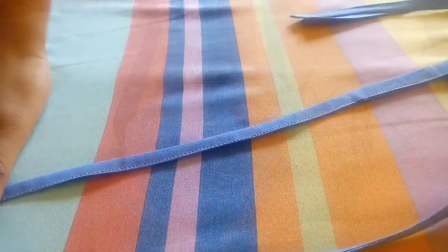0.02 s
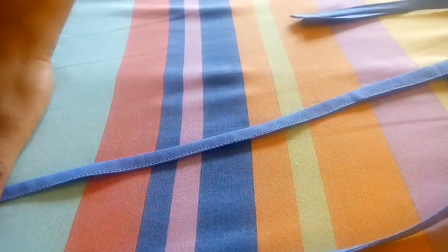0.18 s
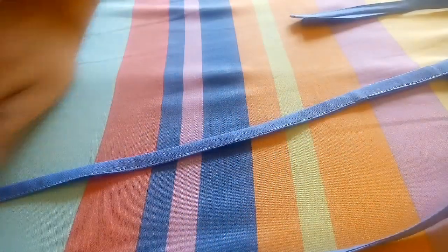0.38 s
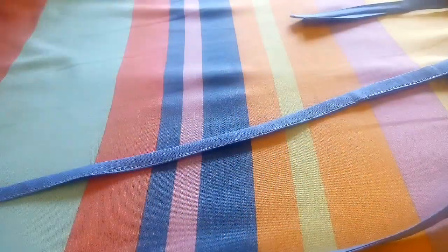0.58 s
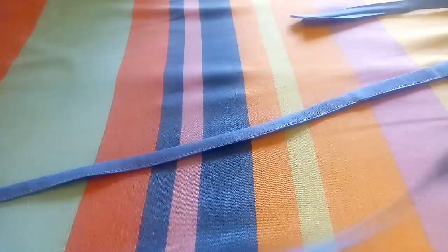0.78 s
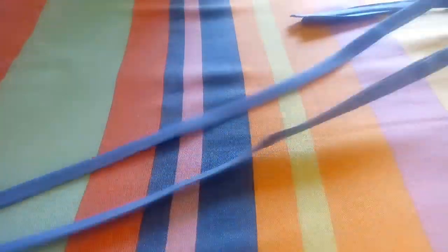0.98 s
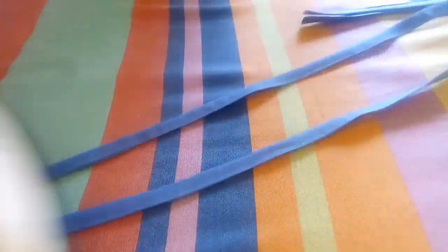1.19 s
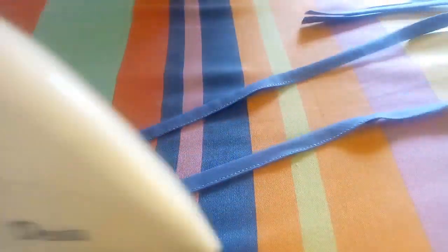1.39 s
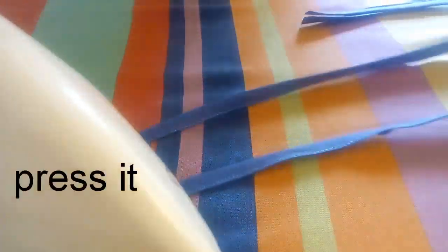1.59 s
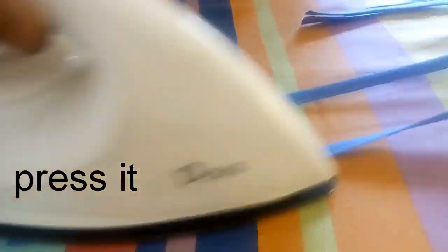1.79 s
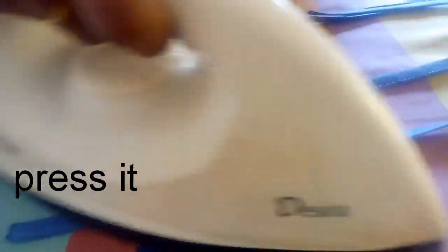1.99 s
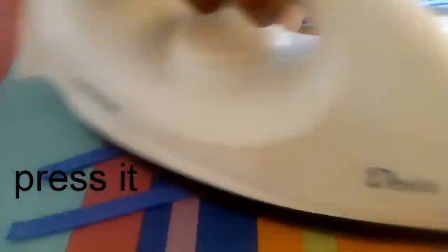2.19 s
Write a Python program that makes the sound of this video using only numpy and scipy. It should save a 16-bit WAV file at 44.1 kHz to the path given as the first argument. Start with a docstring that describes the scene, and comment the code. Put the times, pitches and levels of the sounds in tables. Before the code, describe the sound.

A clothes iron is handled on a padded board in a bare, ringing room with faint low background noise. A short scuff at 0.16 s runs into a hollow knock at 0.22. Low thumps come around 0.7, then a bright, hard double clack at 0.82. Cloth swishes from 1.0 to 1.25 with a duller click at 1.1. Soft dragging follows around 1.5, with tiny ticks and hollow taps until 2.06.

```python
"""Ironing fabric strips on a padded board in a bare, ringing room.
Over a faint, mostly low background, a scuff of shaped noise runs into a hollow knock made of dying tones.
The board thumps with short swelling low tones, and the iron is taken up with a sharp double-snap clack.
The sole then swishes onto the cloth in fluttering noise, amid tiny ticks, a smaller click and low rumble.
Light hollow taps follow, with a duller drag of noise among them."""
import sys
import numpy as np
from scipy import signal
from scipy.fft import rfft, irfft
from scipy.io import wavfile
from scipy.ndimage import uniform_filter1d

SR = 44100
rng = np.random.default_rng(int(sys.argv[2]) if len(sys.argv) > 2 else 0)


def generate_wav(sig):
    """Save sig (samples, or channels by samples) to the path in sys.argv[1] as 16-bit PCM at SR."""
    pcm = np.round(np.clip(np.atleast_2d(sig).T, -1, 1) * 32767).astype(np.int16)
    wavfile.write(sys.argv[1], SR, pcm)


N = 101430  # length of the scene [samples]
T = np.arange(N) / SR  # time [s]
FREQS = np.maximum(np.arange(N // 2 + 1) * SR / N, 1)  # [Hz], kept above zero for the log axis

# colour of the room's answer to the knock and the taps: (frequency [Hz], relative level per Hz [dB])
KNOCK_WASH = [(59, -74), (100, -32), (143, -31.5), (215, -34), (249, -18), (308, -29), (595, -2), (662, -9),
              (910, -10), (1330, -22), (1680, -21), (2000, -30), (2220, -24.5), (3400, -40), (3940, -33.5),
              (16000, -63.5)]


def from_db(db):
    """Turn decibels into gain."""
    return 10 ** (np.asarray(db) / 20)


def at_hz(points):
    """Read a table at every frequency, along a log axis."""
    hz, value = np.transpose(points)
    return np.interp(np.log(FREQS), np.log(hz), value)


def level(points):
    """Turn a level curve into gain over time."""
    return from_db(np.interp(T, *np.transpose(points)))


def panned(pan_db):
    """Gains of left and right; a positive value makes the left louder."""
    return from_db(np.array([[.5], [-.5]]) * pan_db)


def place(x, s, db, pan_db):
    """Start a sound at a given time, level and side."""
    start = int(np.clip(s * SR, 0, N - 1))
    delayed = np.pad(x * panned(pan_db), ((0, 0), (start, 0)))[:, :N]
    return delayed * from_db(db)


def noise(spectrum):
    """Coloured stereo noise of rms 1, most alike on both sides in the bass."""
    # how alike the sides are: (frequency [Hz], left-right correlation [-1 to 1])
    likeness = [(40, 0.38), (125, 0.54), (250, 0.91), (500, 0.52), (1000, 0.04), (12000, 0.089)]
    alike = np.clip(at_hz(likeness), -1, 1)
    mid, side = rfft(rng.standard_normal((2, N)))
    shared = np.sqrt(1 + alike) * mid
    opposed = np.sqrt(1 - alike) * side * [[1], [-1]]
    x = irfft((shared + opposed) * from_db(at_hz(spectrum)), N)
    return x / x.std()


def ring(modes):
    """Struck tones, each losing 60 dB in its own time."""
    tones = 0
    for hz, db, t60 in modes:
        loss_db = np.minimum(60 * T / t60, 300)
        tones = tones + from_db(db - loss_db) * np.sin(2 * np.pi * hz * T)
    return tones


def crack(low_hz, high_hz, db, decay_s):
    """The brief noisy burst of a hard contact, limited to a band of pitch."""
    burst = rng.standard_normal((2, N)) * np.exp(-np.minimum(T / decay_s, 20))
    band = signal.butter(1, [low_hz, min(high_hz, 18000)], "band", fs=SR, output="sos")
    return from_db(db) * signal.sosfilt(band, burst)


def apart(x, lag_s):
    """The same sound at two microphones: a positive lag delays the left, a negative one the right."""
    return np.array([np.interp(T - max(lag, 0), T, x, left=0) for lag in (lag_s, -lag_s)])


def thin(x, hz):
    """Small parts radiate little bass, so the lows are filtered away."""
    return signal.sosfilt(signal.butter(2, hz, "high", fs=SR, output="sos"), x)


def grain(depth_db):
    """A gain that flutters every few milliseconds, by a given rms depth."""
    flutter = uniform_filter1d(rng.standard_normal(N), size=150)
    return from_db(depth_db * flutter / flutter.std())


def wash(spectrum, build_s):
    """The room's answer to a blow: builds quickly, then each band dies at its own rate."""
    # how long the room rings: (frequency [Hz], time to fall by 60 dB [s])
    room_t60 = [(150, 0.62), (400, 0.68), (1000, 0.46), (2700, 0.5), (7000, 0.43), (15000, 0.47)]
    source, out = rfft(noise(spectrum)), 0
    for hz, t60 in room_t60:
        # neighbouring bands fade into each other
        share = at_hz([(f, float(f == hz)) for f, _ in room_t60])
        out = out + irfft(source * share, N) * np.exp(-np.log(1000) * T / t60)
    build = 1 - np.exp(-T / build_s)
    return out * build * grain(depth_db=1)  # reflections arrive in clumps


def rub(spectrum, start_s, end_s, attack_s, release_s, grain_db):
    """Fluttering noise of rough contact, with attack, hold and release."""
    attack = np.clip((T - start_s) / attack_s, 0, 1)
    release = np.exp(-np.maximum(T - end_s, 0) / release_s)
    return noise(spectrum) * attack * release * grain(grain_db)


def bump(hz, rise_s):
    """A padded blow: a tone that swells and dies."""
    age = np.minimum(T / rise_s, 20)
    return age * np.exp(1 - age) * np.sin(2 * np.pi * hz * T)


def background():
    """A soft noise bed, strongest in the lows, whose level wanders."""
    # its colour: (frequency [Hz], relative level per Hz [dB])
    colour = [(18, -57.5), (30, -27.5), (90, -3), (127, -24), (149, 1.5), (184, -7), (295, -2),
              (374, -14.5), (461, -9.5), (512, -15.5), (822, -17.5), (1670, -22.5), (1810, -24.5),
              (2900, -31.5), (5900, -34.5), (16000, -56.5)]
    # its loudness: (time [s], level [dB])
    loudness = [(0, -82), (.14, -106), (.165, -64.5), (.55, -64.5), (.75, -59), (1.3, -64), (1.65, -63.5),
                (1.85, -61.5), (2.1, -61), (2.3, -62)]
    return level(loudness) * noise(colour) * panned(-1.9)


def rumble():
    """Low noise of the iron's movement, rising and falling in level."""
    # its colour: (frequency [Hz], relative level per Hz [dB])
    colour = [(20, -5), (50, 0), (95, 2.5), (140, -4), (250, -11), (600, -50)]
    # its loudness: (time [s], level [dB])
    loudness = [(.12, -102), (.2, -74), (.45, -75), (.56, -66), (.65, -57.5), (.85, -50.5), (1.05, -67.5),
                (1.12, -75), (1.21, -48.5), (1.3, -62), (1.38, -58), (1.56, -62), (1.68, -60), (1.8, -72),
                (2.3, -70.5)]
    return level(loudness) * noise(colour)


def scuff():
    """A short rub, heard as fluttering noise, that runs into the knock."""
    # its colour: (frequency [Hz], relative level per Hz [dB])
    colour = [(59, -71), (100, -65), (234, -3), (343, -14), (583, -0.5), (891, -28), (1080, -12.5),
              (1330, -18.5), (2080, -18.5), (16000, -54.5)]
    rubbing = rub(colour, start_s=.157, end_s=.21, attack_s=0.0046, release_s=.07, grain_db=-1.0)
    return from_db(-43) * panned(-2.5) * rubbing


def knock():
    """A hollow body struck: dying tones and a noisy contact, ringing on in the room."""
    # the blow: (time [s], level [dB], left-right difference [dB])
    blow = (0.2228, -18.5, -2.5)
    # short hollow tones: (frequency [Hz], relative level [dB], time to fall by 60 dB [s])
    hollow_modes = [(530, -3.5, 0.073), (603, -9.5, 0.075), (829, -13, 0.0347), (1340, -35, 0.016),
                    (2720, -22, 0.0078)]
    # fainter tones that ring longer: (frequency [Hz], relative level [dB], time to fall by 60 dB [s])
    long_modes = [(513, -24, .35), (597, -20, .42), (632, -26, .4), (705, -29, .4), (790, -28, .45),
                  (846, -28, .35), (888, -31, .45)]
    tones = apart(ring(hollow_modes) + ring(long_modes), lag_s=-0.0003)
    contact = crack(low_hz=800, high_hz=7000, db=-24, decay_s=0.0057)
    direct = thin(tones + contact, hz=330)
    room = from_db(-9.5) * panned(-1.3) * wash(KNOCK_WASH, build_s=0.0072)
    return place(direct + room, *blow)


def board():
    """Low thumps through the padded board, each a short swelling tone."""
    # the thumps: (time [s], level [dB], left-right difference [dB], pitch [Hz])
    thumps = [(0.595, -48, 26, 103.4), (0.682, -30, -4.5, 77.6), (0.713, -28, -3.5, 69.6),
              (0.809, -40, -1, 68), (0.926, -53.5, -18, 76.6), (1.193, -56, -25, 77), (1.322, -52, -13, 70),
              (1.386, -50, -16.5, 92.4), (1.443, -53.5, -14, 83), (1.495, -50.5, 18, 95.6),
              (1.540, -48.5, 22, 104)]
    return sum(place(bump(hz, rise_s=0.0083), s, db, pan_db) for s, db, pan_db, hz in thumps)


def clack():
    """A hard double snap, a short rattle and a dull body, thrown back by near walls and the whole room."""
    # the clack: (time [s], level [dB], left-right difference [dB])
    blow = (0.8234, -17.5, 4)
    # first reflections: (delay [s], relative level [dB], left-right difference [dB])
    reflections = [(.0023, -13, 0), (.0118, 2, 0), (.0146, -7, -1), (.0196, -4, -3), (.0265, -7, -2),
                   (.030, -7, 0)]
    # short rings of the hard parts: (frequency [Hz], relative level [dB], time to fall by 60 dB [s])
    hard_modes = [(1950, -35, 0.0033), (2634, -4.5, 0.00473), (4060, -3, .003), (5450, -1.5, 0.005),
                  (6600, -8.5, .002)]
    # the iron's body: (frequency [Hz], relative level [dB], time to fall by 60 dB [s])
    body_modes = [(335, -17, 0.11), (496, -17.5, .05), (780, -20.5, .03)]
    # metal that rings on faintly: (frequency [Hz], relative level [dB], time to fall by 60 dB [s])
    metal_modes = [(2415, -28, .6), (2449, -26, .6), (3673, -24, .45), (3985, -25, .45), (4402, -26, .5),
                   (5115, -27, .45), (5658, -27, .45)]
    # colour of rattle and room: (frequency [Hz], relative level per Hz [dB])
    colour = [(60, -29.5), (100, -17.5), (150, -8), (190, -10), (245, -4.5), (330, -8), (430, -13),
              (540, -11), (750, -15.5), (1050, -21.5), (1600, -9), (2350, -0.5), (3150, -8), (3800, -4.5),
              (4300, 1), (4750, -6.5), (5700, -2.5), (7400, -8.5), (9600, -20), (12000, -23.5),
              (15500, -25.5)]
    snap_gap_s, room_delay_s = .00075, .011
    s, db, pan_db = blow

    hard_ring = apart(ring(hard_modes), lag_s=-.00005)
    contact = crack(low_hz=2980, high_hz=5910, db=-1, decay_s=0.00083)
    snap = thin(thin(hard_ring + contact, hz=1510), hz=1510)
    # the first snap is the weaker one
    snaps = place(snap, 0, -5.5, 0) + place(snap, snap_gap_s, 0, 0)
    body = from_db(-3.5) * thin(ring(body_modes), hz=250)
    direct = place(snaps + body, s, db, pan_db)

    echoes = sum(place(snaps, s + delay, db + echo_db, side_db) for delay, echo_db, side_db in reflections)
    rattling = rub(colour, start_s=.8232, end_s=.838, attack_s=.001, release_s=0.011, grain_db=2.5)
    rattle = from_db(-31.5) * rattling
    tail = wash(colour, build_s=.014) + apart(ring(metal_modes), lag_s=.00005)
    return direct + echoes + rattle + place(tail, s + room_delay_s, db=-23.0, pan_db=-2.5)


def swish():
    """The sole swishes onto the cloth: friction noise roughened by the weave."""
    # its colour: (frequency [Hz], relative level per Hz [dB])
    colour = [(200, -15), (400, -7), (530, 12.5), (750, -23), (1500, -12), (2400, 7), (3300, -8.5),
              (4700, -3.5), (6500, -11.5), (8500, -12), (9500, -22.5), (15000, -28)]
    rubbing = rub(colour, start_s=1.0, end_s=1.232, attack_s=0.013, release_s=0.047, grain_db=2.0)
    return from_db(-54) * panned(-1.5) * rubbing


def ticks():
    """Tiny crunchy ticks of the housing: fresh noise bursts that share one room tail."""
    # the ticks: (time [s], level [dB], left-right difference [dB])
    tick_rows = [(1.088, -35, 9), (1.207, -48, -1), (1.359, -54.5, 3), (1.475, -49, 0.5),
                 (1.488, -50.5, 12), (1.499, -55, 0), (1.957, -51.5, 0), (1.973, -55, 0), (1.984, -53, 1),
                 (2.061, -56, 6)]
    # their colour: (frequency [Hz], relative level per Hz [dB])
    colour = [(300, -24), (1500, -1), (2800, 6), (3700, -2.5), (5000, 0), (8000, -17.5), (15000, -29)]
    room = from_db(-30.5) * wash(colour, build_s=0.0059)
    fade = np.exp(-np.minimum(T / 0.0057, 20))  # decay time in s
    return sum(place(from_db(-10) * noise(colour) * fade + room, *row) for row in tick_rows)


def click():
    """A smaller, duller click of the housing: short tones and a noisy contact, with echoes and room."""
    # the click: (time [s], level [dB], left-right difference [dB])
    blow = (1.098, -24.5, -5)
    # first reflections: (delay [s], relative level [dB], left-right difference [dB])
    reflections = [(.0006, -2.5, 0.5), (.0029, -17, -2), (.0083, -14, 0), (0.02, -12, 0)]
    # short rings: (frequency [Hz], relative level [dB], time to fall by 60 dB [s])
    modes = [(1350, -19, 0.016), (2100, -29, .007), (2444, 3, 0.013), (3800, -12.5, 0.014)]
    # colour of the room's answer: (frequency [Hz], relative level per Hz [dB])
    colour = [(150, -22), (600, -11), (1250, -1.5), (2300, -1.5), (3400, -11), (5000, -12.5), (8000, -28),
              (15000, -40)]
    tones = apart(ring(modes), lag_s=.00003)
    contact = crack(low_hz=1520, high_hz=3240, db=-8, decay_s=0.00069)
    direct = thin(tones + contact, hz=930)
    echoes = sum(place(direct, *echo) for echo in reflections)
    room = from_db(-16) * wash(colour, build_s=0.011)
    return place(direct + echoes + room, *blow)


def taps():
    """Light hollow taps as the iron is pushed along: short swelling tones that share one room tail."""
    # the taps: (time [s], level [dB], left-right difference [dB], pitch [Hz])
    tap_rows = [(1.337, -57, 14, 640), (1.359, -46, 7.5, 530), (1.487, -51, 6.5, 544),
                (1.626, -59.5, 9.5, 594), (1.684, -55, 7, 540), (1.956, -50.5, 7, 625),
                (2.0605, -43.5, 6, 655)]
    room = from_db(-23) * wash(KNOCK_WASH, build_s=0.0028)
    return sum(place(bump(hz, rise_s=0.0028) + room, s, db, pan_db) for s, db, pan_db, hz in tap_rows)


def drag():
    """The sole drags along the cloth: duller friction noise roughened by the weave."""
    # its colour: (frequency [Hz], relative level per Hz [dB])
    colour = [(130, -10), (240, 2.5), (300, 1), (400, -11.5), (550, 3), (680, -9.5), (950, -22),
              (3000, -35), (12000, -57)]
    rubbing = rub(colour, start_s=1.45, end_s=1.696, attack_s=0.035, release_s=0.066, grain_db=1.5)
    return from_db(-63) * panned(1) * rubbing


def scene():
    """Add all the sounds together."""
    handling = scuff() + knock() + board() + clack() + ticks() + click() + taps()
    sliding = rumble() + swish() + drag()
    return background() + handling + sliding


def record(dry):
    """Cut the top steeply above 16.1 kHz."""
    low_pass = signal.ellip(10, .2, 80, 16100, fs=SR, output="sos")  # ripple .2 dB, rejection 80 dB
    return signal.sosfilt(low_pass, dry)


dry = scene()
out = record(dry)
generate_wav(out)
```